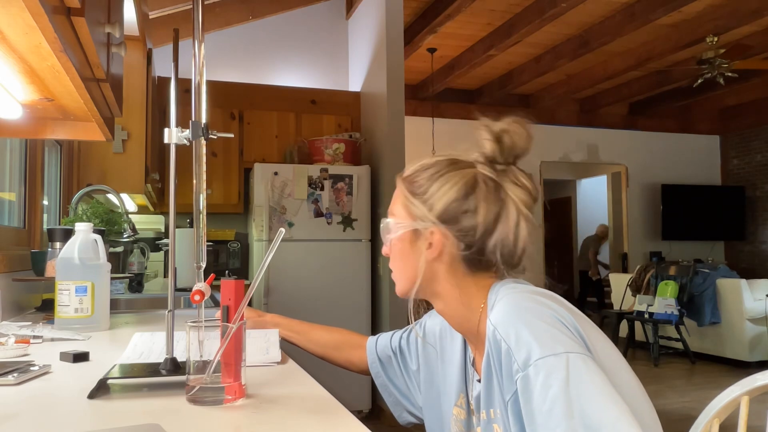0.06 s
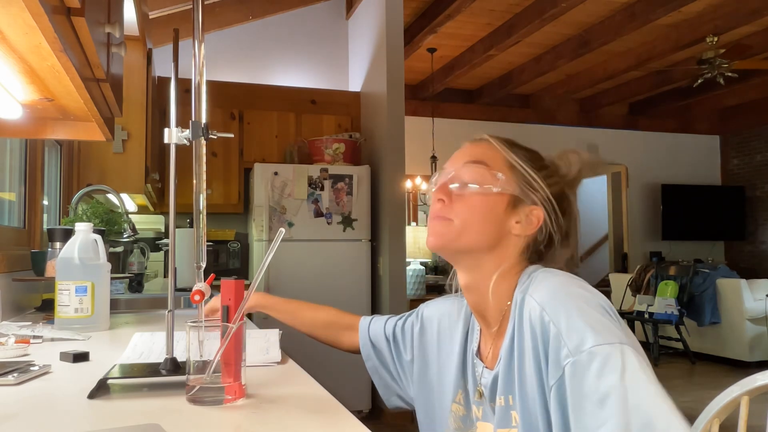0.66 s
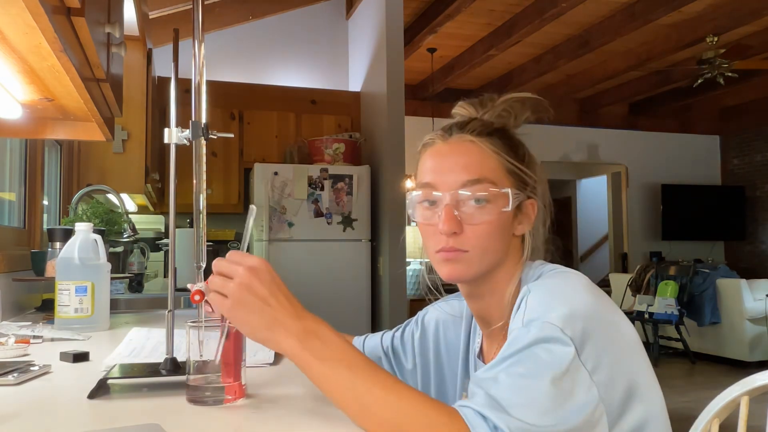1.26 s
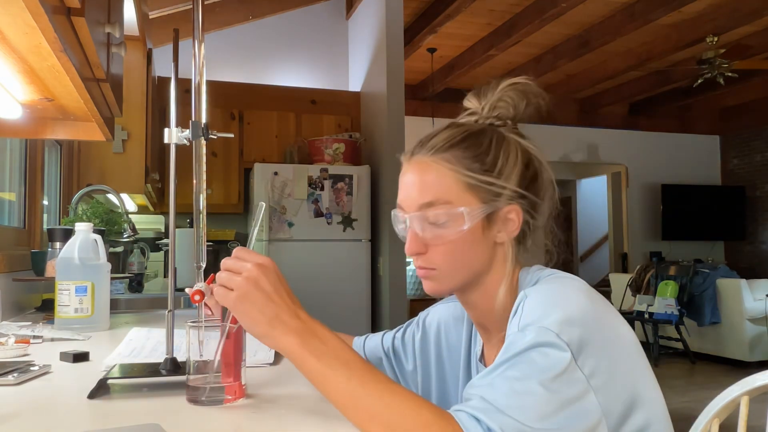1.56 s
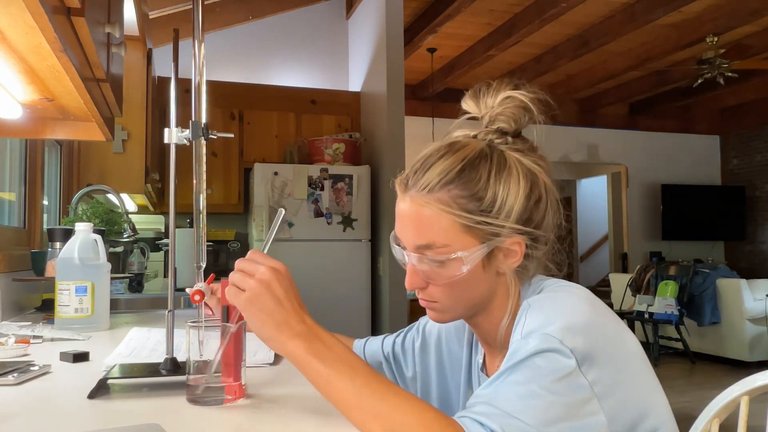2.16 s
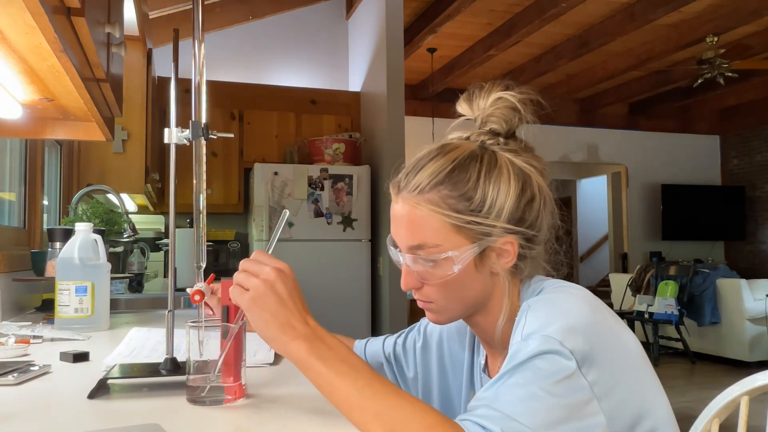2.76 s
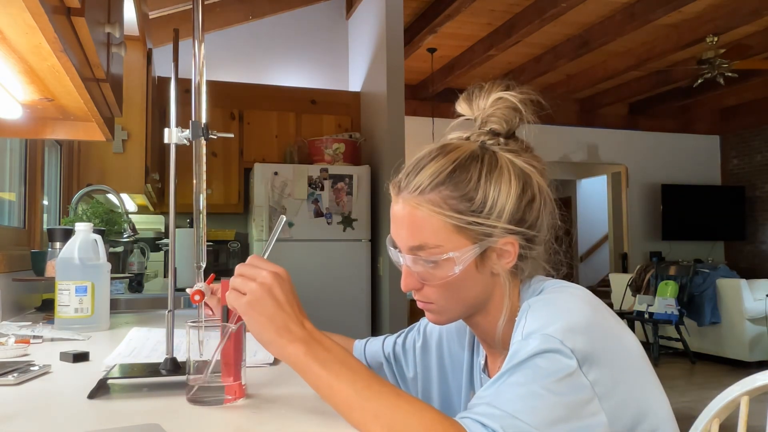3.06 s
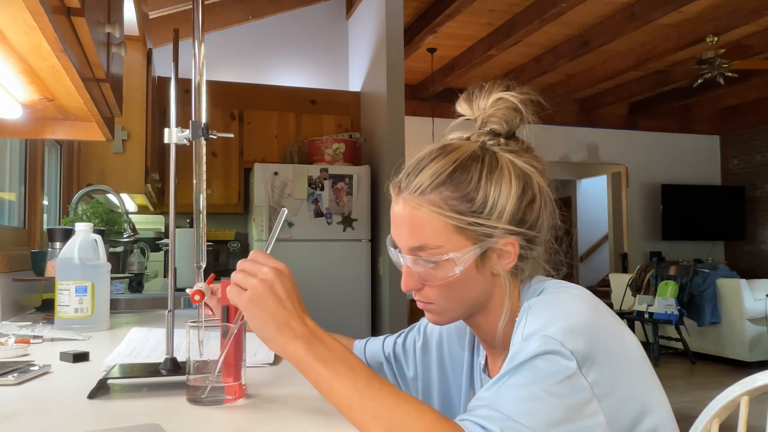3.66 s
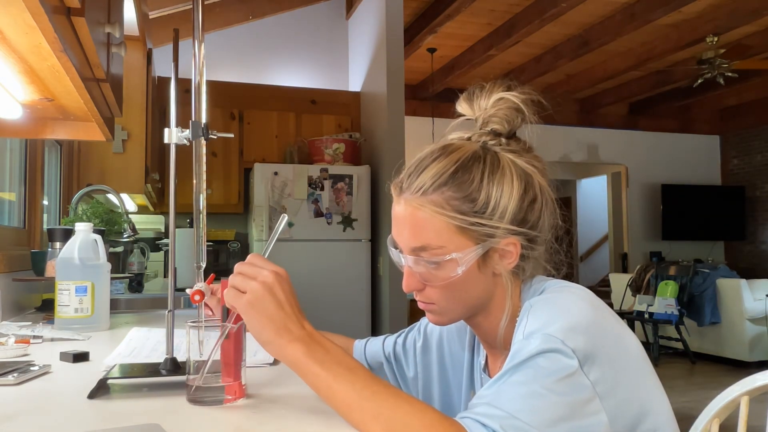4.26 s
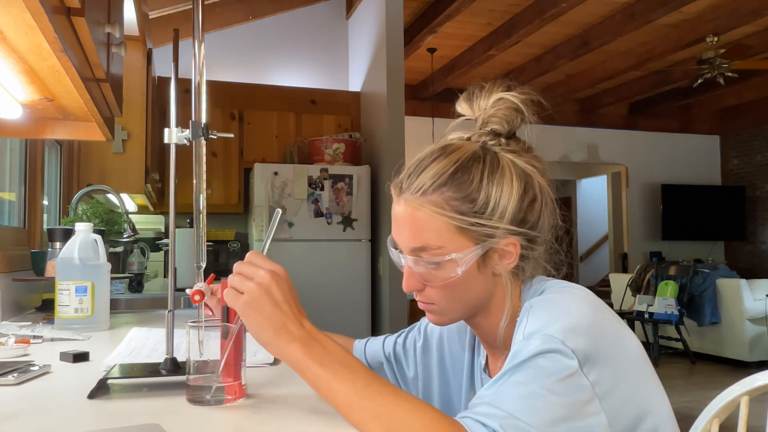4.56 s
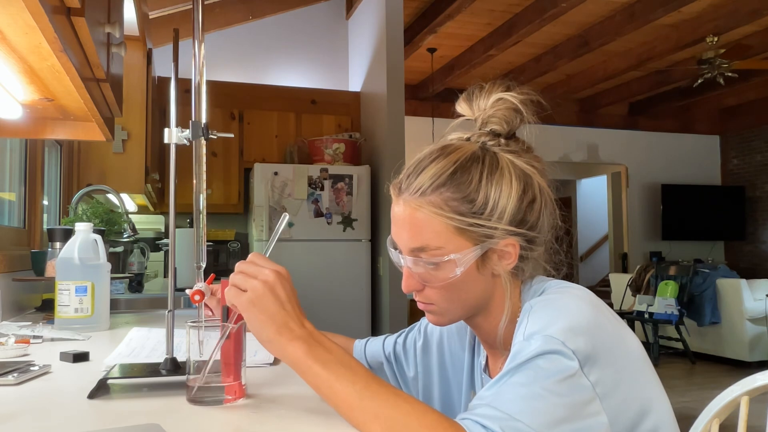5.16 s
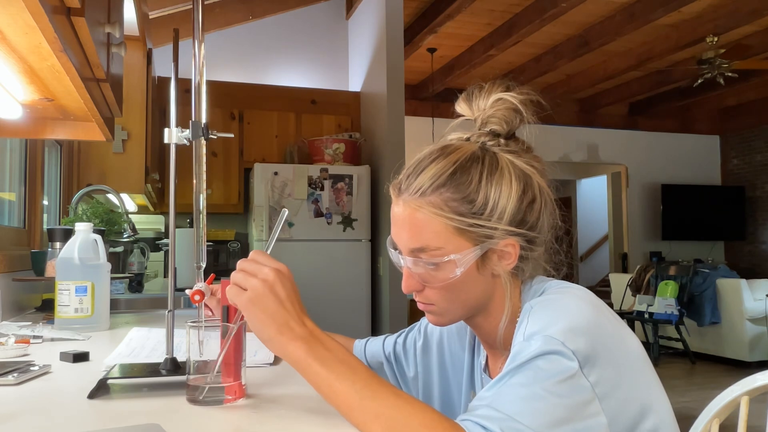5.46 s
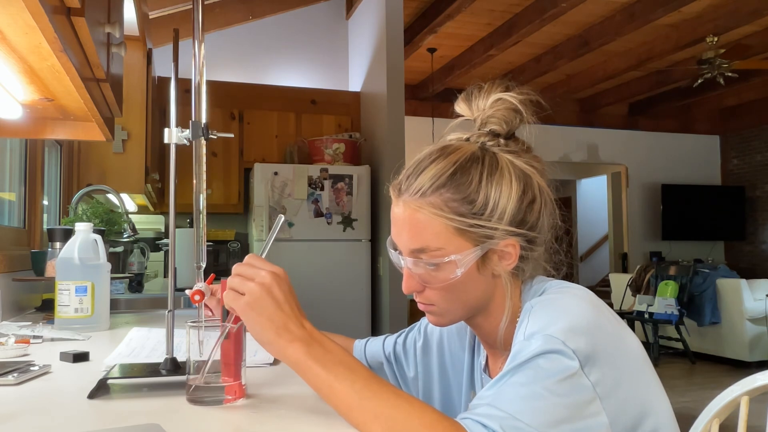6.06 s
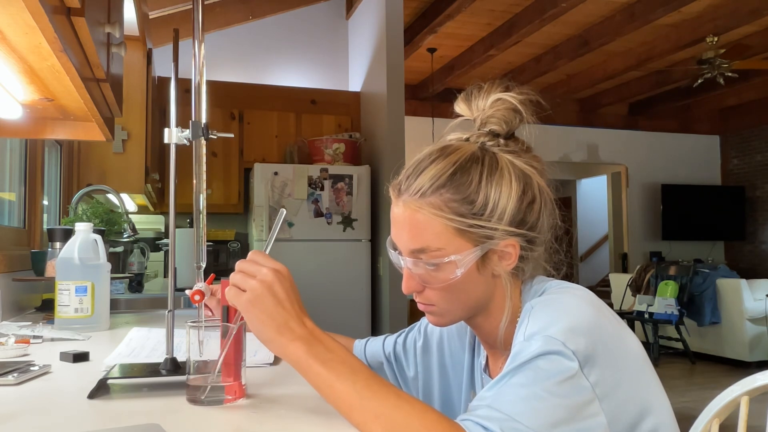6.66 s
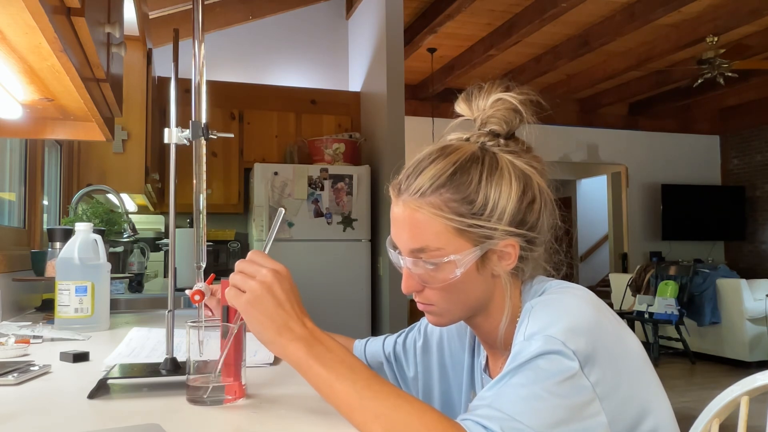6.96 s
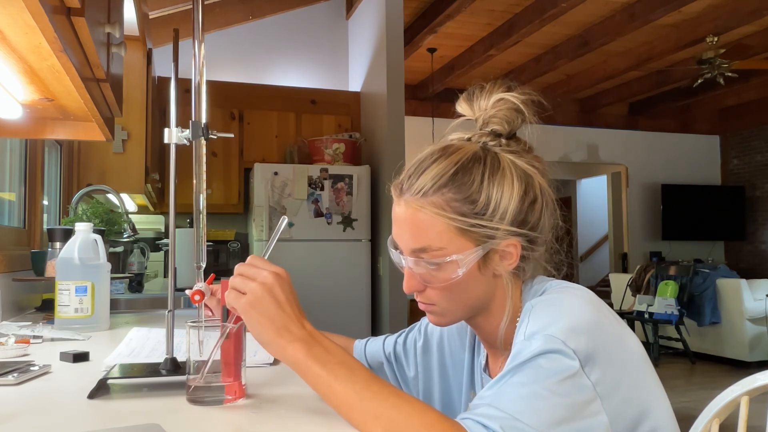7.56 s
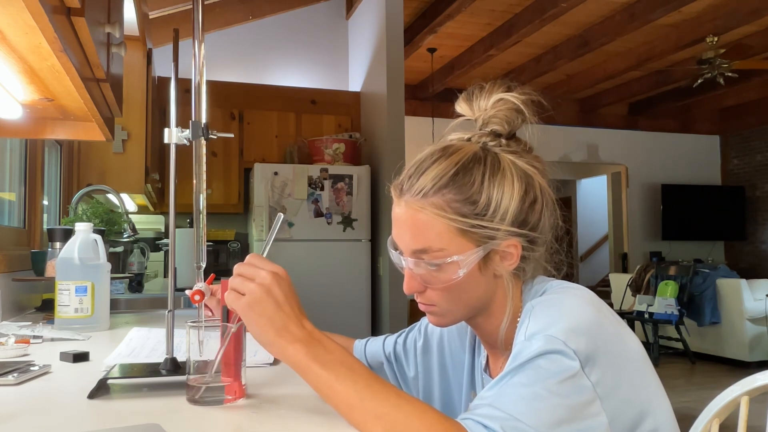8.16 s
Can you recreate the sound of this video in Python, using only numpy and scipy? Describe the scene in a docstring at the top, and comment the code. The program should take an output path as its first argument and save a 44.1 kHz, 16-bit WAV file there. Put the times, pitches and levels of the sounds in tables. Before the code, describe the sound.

Faint air noise and a low appliance hum fill a quiet kitchen throughout. At about 0.6 seconds a hand gives a metal stand a soft, dull knock, followed by light brushing. At about 1.1 seconds a glass rod slides over the rim of a beaker with a brief scrape. From 1.2 seconds until the end, near 8.4 seconds, the rod stirs, striking the wall in quick, uneven clinks, many each second. Some are bright and briefly ringing, others dull; the strongest come around 1.6 and 2.5 seconds. A little liquid swishes softly underneath, most clearly at first. The tip drags on the bottom in short, low groans several times between 1.8 and 3.4 seconds, then more faintly near 6.3 and 7.4 seconds. The clinking eases slightly around 5 seconds and picks up again. Everything is close to the microphone, with a short room echo.

```python
"""A knock and a brush of the hand at the stand come first; then a glass rod stirs a little liquid
in a beaker on a kitchen counter, close to a phone. Each impact of the rod excites the damped modes
of the wall, a clink, and sets the liquid swishing. Now and then the tip drags over the bottom, where
stick-slip friction makes a low groan. The kitchen adds a short echo, air noise and an appliance's hum."""
import sys
import numpy as np
from scipy import signal
from scipy.fft import rfft, irfft, next_fast_len
from scipy.io import wavfile

SR = 44100
rng = np.random.default_rng(int(sys.argv[2]) if len(sys.argv) > 2 else 0)


def to_wav(s):
    """Save 16-bit WAV."""
    ch = np.atleast_2d(s).T  # columns
    pcm = np.round(np.clip(ch, -1, 1) * 32767)  # PCM
    wavfile.write(sys.argv[1], SR, pcm.astype(np.int16))


N = 371322
HIT = 8192  # samples in the buffer of one short event

# Modes of beaker and rod. Each row: frequency in Hz, relative level in dB, nominal t60 in seconds.
GLASS_MODES = [(2895, -3, .09), (5620, -10.5, .19), (5780, -9.5, .21), (7760, -5, .16), (730, -9, .03),
               (1650, -13, .025), (1910, -3.5, .04), (2110, -7, .03), (2780, -7, .025), (3030, -1, .025),
               (3390, -10, .04), (4500, -10, .025), (5700, -6, .04), (5980, -8, .025), (7650, -5, .025),
               (7900, -4, .035), (11450, -6, .03), (12020, -10, .06), (12400, -6, .07), (13100, -1, .022),
               (13330, -1, .022), (13980, 0, .03), (14150, -3, .07), (14460, -1, .06)]
# Spectrum of the contact's crack. Each row: frequency in Hz, gain in dB.
CRACK_SPECTRUM = [(90, -36.5), (380, -11.5), (540, -9), (740, 1), (900, -9), (1200, -3), (1650, -2),
                  (1950, 4), (2350, -7), (3050, 8.5), (3900, 0.5), (5700, -2), (6900, -12), (7800, -4),
                  (8600, -12.5), (9600, -3), (10900, -7), (13200, 9), (14600, 4.5), (16000, -28.5)]
# Edges in Hz of six registers, from the low knock through clack and ring up to the tick.
REGISTER_EDGES = [450, 1400, 2400, 5000, 6800, 10500, 16000]
# Each row: one register's share of a middling contact in dB, dB gained per dB of hardness,
# dB gained per dB of level above middling.
REGISTER_SHARES = [(-8, -0.19, -0.17), (-4.5, -.5, 0.06), (0.15, -0.5, 0.02), (-3.5, 0.35, 0.13),
                   (0.23, 0.15, 0.11), (1.5, 1.2, -0.21)]
# The rod on the wall. Each row: start in seconds, level in dB, hardness in dB.
# A hard, glancing contact is bright; a soft, pressed one is dull.
WALL_CONTACTS = [(1.126, -55, -1), (1.2437, -34, 0), (1.291, -52, 1.5), (1.363, -35.5, -10),
                 (1.4621, -35.5, -9), (1.5849, -35, -8.5), (1.6477, -29.5, 4), (1.751, -41, 10),
                 (1.7819, -42, -3.5), (1.865, -36.5, 3.5), (2.011, -43, -3), (2.0886, -35.5, 6),
                 (2.2599, -42, -1.5), (2.2821, -39, 3.5), (2.4107, -49, 12.5), (2.4914, -28.5, 5.5),
                 (2.594, -39.5, 8.5), (2.614, -43.5, 6.5), (2.6717, -44.5, -2), (2.706, -44.0, 3),
                 (2.736, -46, 2), (2.8367, -55, -6.5), (2.8695, -39, 2.5), (2.9421, -47.0, 0),
                 (2.954, -40.5, 4), (3.0406, -47.5, -7.5), (3.079, -55.5, -10), (3.1173, -50, -7),
                 (3.1645, -40.5, 2.5), (3.1802, -43.5, 7), (3.2366, -41.5, -5), (3.3053, -42, 8),
                 (3.3226, -53, 10), (3.3431, -43, -1), (3.4008, -37.5, 4.5), (3.4156, -45.5, 8),
                 (3.482, -37.5, -1.5), (3.532, -53.0, -8), (3.5774, -49.5, 1), (3.619, -36, 6.5),
                 (3.6457, -40, 6.5), (3.7588, -45, 7.5), (3.782, -46, -1), (3.7911, -50, -10.5),
                 (3.875, -38, 6.5), (3.9859, -46.0, 4), (3.998, -38, -1.5), (4.079, -38.5, 4),
                 (4.1118, -45.5, 2.5), (4.2082, -48.5, 4), (4.2251, -42, -2), (4.2603, -47, -4),
                 (4.3344, -37, 7), (4.39, -49.0, -12), (4.447, -50, -8.5), (4.5361, -38.5, 3.5),
                 (4.5588, -48, -4), (4.588, -48.5, -5), (4.6502, -39, -5.5), (4.7505, -43.5, 2),
                 (4.7978, -57, -15), (4.9342, -50, -3.5), (4.9703, -54.5, -1), (5.032, -48, 1.5),
                 (5.0522, -52.0, -10.5), (5.1071, -53, -8), (5.1466, -39.5, -2), (5.2102, -48.5, 2),
                 (5.2261, -43, 7.5), (5.3796, -41, -0.5), (5.4628, -40, 7.5), (5.552, -44, -6),
                 (5.584, -52, -7), (5.6038, -38.5, -4.5), (5.719, -49.5, 3), (5.741, -47, -5.5),
                 (5.89, -38, 5), (5.9554, -39.5, 4.5), (5.9818, -39, -2.5), (6.1047, -50, -4),
                 (6.171, -36, 7), (6.233, -46.5, -8.5), (6.2883, -37, -3.5), (6.378, -40, 4),
                 (6.4538, -43, 4), (6.468, -48.5, -15), (6.55, -47.5, -4), (6.6244, -42.5, 4.5),
                 (6.6544, -44, 6), (6.7734, -42.5, -4), (6.827, -41.5, -0.5), (6.9215, -46.5, 2),
                 (7.1115, -42.5, -3), (7.143, -36.5, 4), (7.2028, -49, 1), (7.2263, -48, -5),
                 (7.3323, -49.5, 9.5), (7.3526, -49.5, -8), (7.4033, -40.5, 3), (7.4357, -46.5, 4.5),
                 (7.482, -38.0, -3), (7.547, -40.5, -5), (7.638, -42.5, 2), (7.6826, -41.5, 6),
                 (7.7184, -41, -5.5), (7.7772, -36.5, -1.5), (7.8503, -39, 2), (7.9096, -40.5, 4),
                 (7.9662, -49, -9), (8.0258, -44.5, -3), (8.0347, -39.5, -1), (8.0737, -43, 1),
                 (8.1168, -37, 5.5), (8.1388, -41, -4), (8.2291, -39.5, -0.5), (8.267, -45, 3.5)]


def clinks(crack_db=5.0, crack_t60=0.022, snap_db=7, contact_s=0.0039,
           bounce_s=0.0054, bounce_db=-9, bounce_per_hardness=0.11,
           lag_cycles=0.97, blend=1.216, free_ring=0.67, doubling_db=30, middling_db=-38.5):
    """Impact excitation: each contact cracks and rings the modes of the glass, and the rod bounces once."""
    out, t = np.zeros(N), np.arange(HIT) / SR
    # the phone's processing delays each clink's low tones slightly behind its treble
    lag = np.exp(-2j * np.pi * lag_cycles * np.log(freqs(t) + 100))
    corners = np.sort(np.outer(REGISTER_EDGES, [1 / blend, blend]).ravel()[1:-1])
    snap = undb(snap_db) * np.exp(-(t / contact_s) ** 2)
    crack_shape = undb(crack_db) * (fade(t, crack_t60) + snap)
    share_db, per_hardness, per_level = np.transpose(REGISTER_SHARES)
    for start, db, hardness in WALL_CONTACTS:
        # a hard strike leaves the wall free to ring; a pressed one damps it
        sustain = free_ring * 2 ** (hardness / doubling_db)
        crack = colour(rng.standard_normal(HIT) * crack_shape, CRACK_SPECTRUM)
        delay = np.exp(-2j * np.pi * freqs(t) * bounce_s * (.5 + rng.random()))
        bounce = undb(bounce_db + bounce_per_hardness * hardness) * delay
        hit = irfft(rfft(ringing(GLASS_MODES, sustain) + crack) * lag * (1 + bounce))
        # hardness moves energy to the upper registers; force favours the ring
        wanted_db = db + share_db + per_hardness * hardness + per_level * (db - middling_db)
        gain_db = np.repeat(wanted_db - register_db(hit), 2)
        clink = colour(hit, np.column_stack([corners, gain_db]))
        add(out, start, clink[:-HIT // 8])
    return out


# The tip on the bottom. Each row: start and length in seconds, groan level in dB, groan frequency in Hz,
# then the lower groan and the counter's boom in dB relative to the groan.
TIP_DRAGS = [(1.808, 0.069, -49.5, 926, -3.5, -7), (2.199, 0.06, -49, 890, -2.5, -4),
             (2.528, 0.064, -47, 840, -11.5, -7.5), (2.978, 0.077, -57.5, 830, -1, -9),
             (3.316, 0.06, -51, 860, -2.5, 2), (6.26, .1, -58.5, 990, -16, -17),
             (7.245, 0.057, -68, 840, -10, -10), (7.52, 0.082, -67, 940, -12, -33)]


def drags(slip_hz=175, jitter=0.55, width_hz=100, lower_hz=525, lower_width_hz=70,
          counter_hz=178, boom_width_hz=32, grit_db=-7, grit_hz=1200):
    """Stick-slip friction: uneven slips of the tip drive resonances of the beaker and the counter."""
    out, t = np.zeros(N), np.arange(HIT) / SR
    for start, length, db, hz, lower_db, boom_db in TIP_DRAGS:
        spacing, force = rng.standard_normal((64, 2)).T
        times = np.cumsum(np.exp(jitter * spacing)) / slip_hz
        times -= times[0]
        inside = times < length
        slips = np.zeros(HIT)
        slips[(times[inside] * SR).astype(int)] = undb(2 * force[inside])
        groan = unit(resonate(slips, hz, width_hz, 3 * width_hz))
        lower = unit(resonate(slips, lower_hz, lower_width_hz, 365))
        boom = unit(resonate(slips, counter_hz, boom_width_hz, 4 * boom_width_hz))
        # between the slips the tip grinds on
        arch = np.sqrt(np.sin(np.pi * np.minimum(t / length, 1)).clip(0))
        grit = unit(resonate(rng.standard_normal(HIT) * arch, grit_hz, 1400, 1800))
        sound = groan + undb(lower_db) * lower + undb(boom_db) * boom + undb(grit_db) * grit
        add(out, start, undb(db) * sound * np.sqrt(length * SR / HIT))
    return out


def slide(start_s=1.07, length_s=0.077, attack_s=.006, release_s=0.027, db=-38, sag_db_per_s=162,
          catches_per_s=800, scatter_db=3, body_hz=2900, body_width_hz=2400, bright_db=-4):
    """Sliding friction: the rod slides in over the rim, and each tiny catch rings the damped beaker."""
    out, t = np.zeros(N), np.arange(HIT) / SR
    catches = (rng.random(HIT) < catches_per_s / SR) * undb(scatter_db * rng.standard_normal(HIT))
    ring = signal.fftconvolve(catches, ringing(GLASS_MODES, sustain=.6))[:HIT]
    rattle = resonate(ring, body_hz, body_width_hz) + undb(bright_db) * ring
    contact = np.clip(np.minimum(t / attack_s, (length_s - t) / release_s), 0, 1)
    add(out, start_s, unit(rattle) * contact * undb(db - sag_db_per_s * t))
    return out


# Brushes, swishes and a few soft ticks of the rod on the beaker's bottom. Each row: start in seconds,
# length in seconds (cut to HIT samples), level in dB, centre frequency in Hz, bandwidth in Hz.
SWISHES_AND_TICKS = [(0.57, 0.042, -73, 1300, 700), (0.667, 0.2, -74.5, 4400, 400),
                     (0.66, 0.18, -72.5, 7800, 2300), (0.7, 0.2, -65.5, 910, 830),
                     (0.818, .115, -61.5, 3160, 2200), (0.826, .115, -64.5, 9722, 9000),
                     (1.06, 0.055, -46.5, 1810, 2440), (2.8, 0.032, -64, 168, 55),
                     (3.956, 0.038, -53, 2778, 2160), (4.107, 0.11, -53.5, 2460, 1800),
                     (4.459, 0.11, -65, 6530, 120), (4.677, 0.041, -61, 3600, 830),
                     (4.908, 0.016, -52.5, 3100, 900), (5.308, 0.092, -76, 2280, 300),
                     (5.821, 0.012, -60.5, 3260, 555.6), (6.934, 0.094, -72.5, 1990, 1380),
                     (7.56, 0.066, -62, 2500, 2144), (8.403, 0.0061, -58, 3280, 1389)]


def swishes_and_ticks(grain_db=3):
    """Band-limited noise: skin, glass and liquid brush and swish; the briefest bursts are rod ticks."""
    out = np.zeros(N)
    for start, length, db, hz, width in SWISHES_AND_TICKS:
        size = int(min(length * SR, HIT))
        noise, grain = rng.standard_normal((2, HIT))[:, :size]
        burst = resonate(noise * undb(grain_db * grain), hz, width, min(2 * width, SR / 4))
        add(out, start, undb(db) * unit(burst * signal.windows.tukey(size, .7)))
    return out


# Noise of the moving liquid. Each row: frequency in Hz, relative spectral density in dB.
LIQUID_SPECTRUM = [(200, -33), (600, -3), (1200, -3), (2000, 1), (3300, 0), (5000, -12), (9000, -8.5),
                   (16000, -28.5)]


def swirl(shove_db=-24.5, shove_per_softness=1.46, rise_s=0.0067, settle_t60=0.26, lap_hz=25, lap_db=3):
    """Incoherent addition: contacts shove the liquid, pressed ones most, and the surges add in power."""
    power, t = np.zeros(N), np.arange(N) / SR
    surge = np.minimum(t[:SR] / rise_s, 1) * fade(t[:SR], settle_t60)
    for start, db, hardness in WALL_CONTACTS:
        shove = undb(db + shove_db - shove_per_softness * hardness)
        add(power, start, (shove * surge) ** 2)
    laps = rng.standard_normal(1024)
    lapping = undb(lap_db * np.interp(t * lap_hz, np.arange(len(laps)), laps))
    return noise_bed(LIQUID_SPECTRUM) * np.sqrt(power) * lapping


# Modes of the stand. Each row: frequency in Hz, relative level in dB, t60 in seconds.
STAND_MODES = [(680, -0.5, 0.053), (780, -3, 0.031), (870, -2.5, 0.034), (1140, -8, 0.02),
               (1317, -0.5, 0.034), (2350, -15, .04)]
# The hand at the stand. Each row: start in seconds, gain in dB.
HAND_KNOCKS = [(0.608, -33.5), (.635, -43.5)]


def knocks(tick_db=3, tick_t60=0.06, body_hz=1000, body_width_hz=1300, bright_db=-21):
    """Heavy damping: the stand's modes die quickly, giving dull knocks with a faint bright edge."""
    out = np.zeros(N)
    for start, db in HAND_KNOCKS:
        tick = rng.standard_normal(HIT) * fade(np.arange(HIT) / SR, tick_t60)
        body = resonate(ringing(STAND_MODES) + undb(tick_db) * tick, body_hz, body_width_hz)
        add(out, start, undb(db) * (body + undb(bright_db) * tick))
    return out


# Strength of the echo. Each row: frequency in Hz, gain in dB.
ECHO_GAINS = [(150, -2.5), (700, -4.5), (2000, -12), (6000, -13.5), (14000, -10.5)]
# Reverberation time. Each row: frequency in Hz, t60 in seconds.
ECHO_DECAYS = [(200, 0.06), (1000, 0.16), (3000, 0.18), (7000, 0.23), (14000, 0.14)]


def kitchen_echo(x, first_s=0.00043, build_s=0.01):
    """Reverberation: reflections from counter, cupboards and ceiling decay at each band's own rate."""
    t = np.arange(2 * HIT) / SR
    noise, tail = rfft(rng.standard_normal(len(t))), 0
    edges = np.r_[0, np.geomspace(200, SR / 2, 10)]
    for lo, hi in zip(edges, edges[1:]):
        hz = (lo + hi) / 2
        shape = fade(t, along(hz, ECHO_DECAYS)) * np.clip((t - first_s) / build_s, 0, 1)
        band = irfft(noise * ((freqs(t) >= lo) & (freqs(t) < hi)))
        tail = tail + undb(along(hz, ECHO_GAINS)) * band * shape / np.linalg.norm(shape)
    return signal.fftconvolve(x, tail)[:N]


# Tones of the appliance. Each row: frequency in Hz, full rms level in dB.
HUM_TONES = [(119, -79.5), (232, -82), (720, -89.5), (959, -80), (1439, -85)]


def appliance_hum(fade_in_s=1.5):
    """A line spectrum: the tones fade in and waver slightly with a shared random drift of phase."""
    t = np.arange(N) / SR
    drift = .0005 * np.cumsum(rng.standard_normal(N)) / np.sqrt(SR)
    hum = sum(undb(db) * np.sqrt(2) * np.sin(2 * np.pi * hz * (t + drift)) for hz, db in HUM_TONES)
    return hum * np.interp(t, [0, fade_in_s], [.4, 1])


# Kitchen air. Each row: frequency in Hz, relative spectral density in dB.
AIR_SPECTRUM = [(30, -54.5), (65, -24), (90, -9.5), (125, 1), (180, 5.5), (250, 6.5), (340, -16.5),
                (600, -14.5), (1000, -14.5), (2000, -21), (3000, -20), (6000, -26), (15000, -31)]


def kitchen_air(db=-65, opening_db=-4, fade_in_s=0.79):
    """A continuous spectrum: steady low room noise, which the phone fades in at the start."""
    fade_in_db = np.interp(np.arange(N) / SR, [0, fade_in_s], [opening_db, 0])
    return noise_bed(AIR_SPECTRUM) * undb(db + fade_in_db)


def ringing(modes, sustain=1, scatter_db=4.5, detune=0.0033, split_hz=32):
    """Modal superposition: each damped mode, detuned a little by the touch, is a close pair that beats."""
    hz, db, t60 = np.float32(modes).T[:, :, None]
    size, shift, split, phase = rng.standard_normal((4, len(modes), 1), dtype=np.float32)
    t = np.arange(HIT, dtype=np.float32) / SR
    tone = np.sin(2 * np.pi * (hz * (1 + detune * shift) * t + phase))
    beat = np.cos(2 * np.pi * split_hz * split * t)
    envelope = undb(db + scatter_db * size) * fade(t, t60 * float(sustain))
    return np.sum(envelope * tone * beat, axis=0)


def resonate(x, hz, *widths_hz):
    """Resonances in series, one per bandwidth, with gain 1 at their common centre."""
    for width in widths_hz:
        x = signal.lfilter(*signal.iirpeak(hz, hz / width, fs=SR), x)
    return x


def colour(x, points):
    """Minimum-phase filter with the given (Hz, dB) response."""
    cepstrum = irfft(np.log(undb(along(freqs(x), points))), len(x))
    cepstrum[1:len(x) // 2] *= 2
    cepstrum[len(x) // 2 + 1:] = 0
    return irfft(rfft(x) * np.exp(rfft(cepstrum)), len(x))


def noise_bed(spectrum):
    """Steady coloured noise of rms 1."""
    return unit(colour(rng.standard_normal(next_fast_len(N, True)), spectrum)[:N])


def register_db(x):
    """Band power of the first 10 ms in each register, in dB."""
    head = x[:SR // 100]
    power = 2 * abs(rfft(head, HIT)) ** 2 / HIT / len(head)
    return 10 * np.log10(np.histogram(freqs(x), REGISTER_EDGES, weights=power)[0] + 1e-20)


def fade(t, t60):
    """Exponential decay by 60 dB in t60."""
    return np.exp(-np.minimum(float(np.log(1000)) * t / t60, 20))


def along(hz, points):
    """Interpolate (Hz, value) points on a log-frequency axis."""
    f, value = np.transpose(points)
    return np.interp(np.log(np.maximum(hz, 1)), np.log(f), value)


def freqs(x):
    """Frequencies of the spectrum of x."""
    return np.fft.rfftfreq(len(x), 1 / SR)


def undb(db):
    """Decibels to gain."""
    return 10 ** (np.asarray(db) / 20)


def unit(x):
    """Scale to rms 1."""
    return x / np.sqrt(np.mean(x ** 2) + 1e-20)


def add(out, start_s, x):
    """Mix x into out from start_s."""
    i = max(int(start_s * SR), 0)
    out[i:i + len(x)] += x[:max(N - i, 0)]


def scene():
    """Superposition: the direct sound from the counter, its echo and the room's own noise."""
    direct = clinks() + drags() + slide() + swishes_and_ticks() + swirl() + knocks()
    return (direct + kitchen_echo(direct) + appliance_hum() + kitchen_air())[None]


def record(dry, bass_hz=92, top_hz=16100):
    """Band limiting: the phone cuts the deep bass and the top."""
    thin = signal.sosfilt(signal.butter(6, bass_hz, "high", fs=SR, output="sos"), dry)
    return signal.sosfilt(signal.ellip(8, .2, 70, top_hz, fs=SR, output="sos"), thin)


dry = scene()
out = record(dry)
to_wav(out)
```